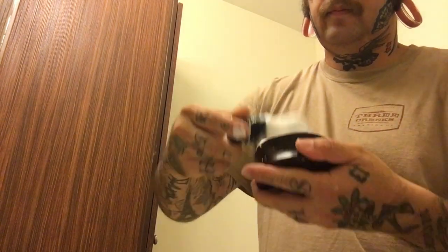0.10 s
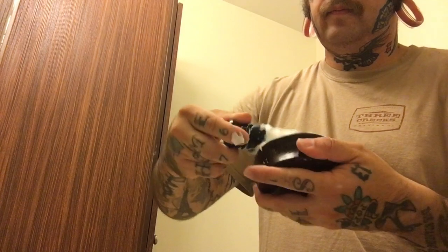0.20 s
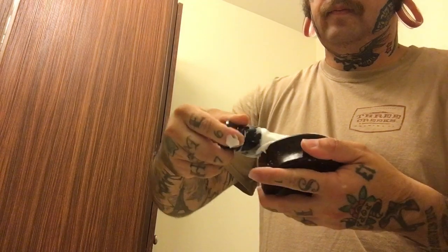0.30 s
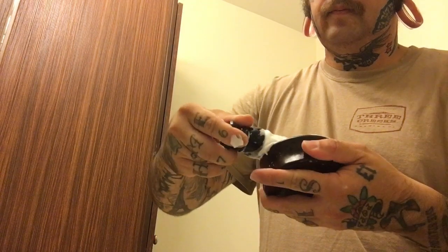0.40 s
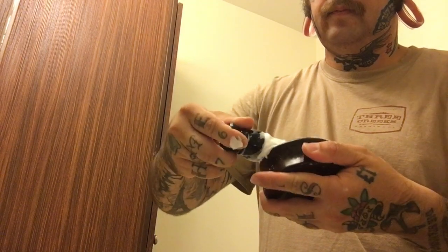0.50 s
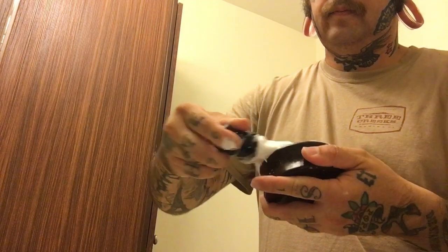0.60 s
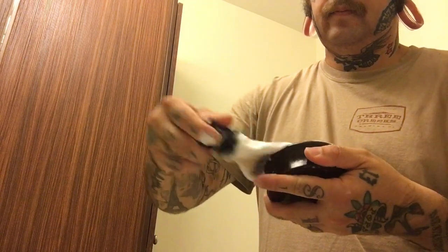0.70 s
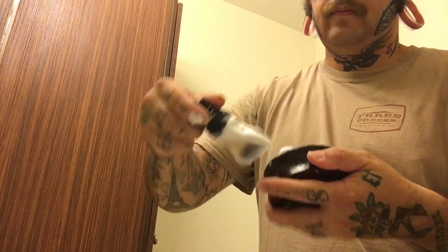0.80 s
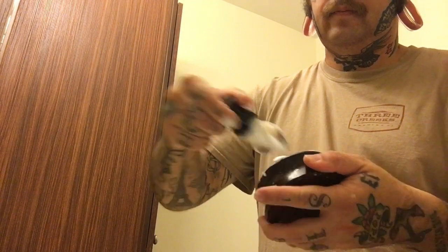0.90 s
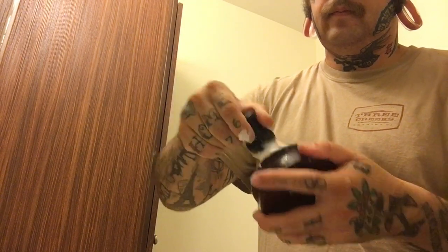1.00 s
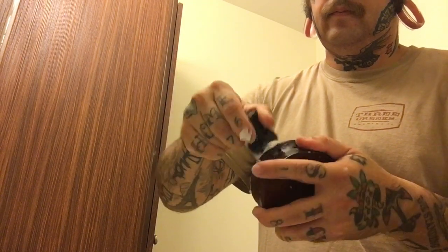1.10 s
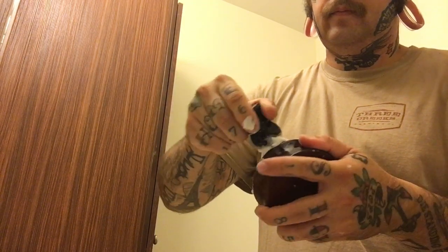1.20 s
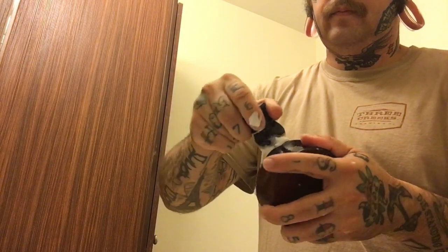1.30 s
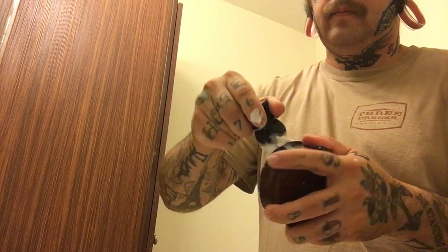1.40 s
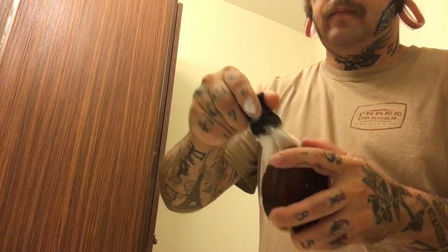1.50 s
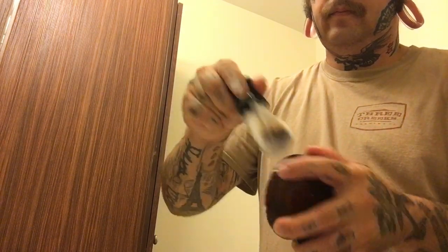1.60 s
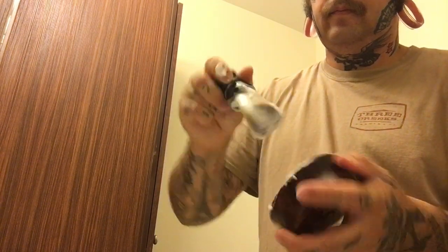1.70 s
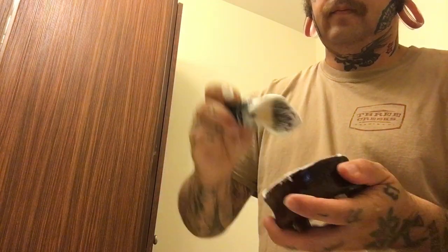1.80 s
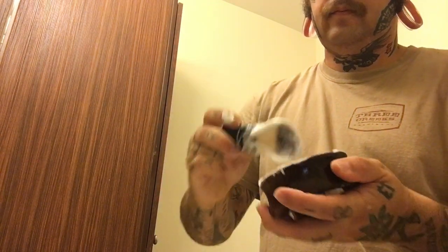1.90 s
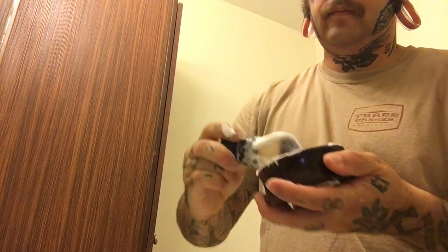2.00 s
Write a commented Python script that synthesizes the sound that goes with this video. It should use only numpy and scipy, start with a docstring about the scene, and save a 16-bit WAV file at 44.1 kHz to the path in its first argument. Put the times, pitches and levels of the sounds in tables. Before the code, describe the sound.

Two hard wooden knocks ring briefly in a small bathroom as a shaving brush hits the rim of a bowl. A quiet, foamy swish of bristles follows each one, heard from nearby over faint electrical hum.

```python
"""Shaving brush in a wooden bowl

A shaving brush works lather in a hand-held wooden bowl, in a small, live bathroom.
Twice its handle ticks and then knocks hard on the rim; after each knock the wet bristles
are drawn out over the edge with a soft, fizzing swish. Mains hum and faint room noise lie underneath."""
import sys
import numpy as np
from scipy import signal
from scipy.fft import rfft, irfft, next_fast_len
from scipy.io import wavfile

SR = 44100
rng = np.random.default_rng(int(sys.argv[2]) if len(sys.argv) > 2 else 0)


def unload_audio(sound):
    """Save the sound as a 16-bit wav file, at the path given as the first command line argument."""
    columns = np.transpose(np.atleast_2d(sound))
    # keep every value between -1 and 1, then stretch to whole-number steps
    steps = np.round(np.clip(columns, -1, 1) * 32767)
    wavfile.write(sys.argv[1], SR, steps.astype(np.int16))


N = 88200
TIME = np.arange(N) / SR


def amp(db):
    """Decibels to gain."""
    return 10 ** (np.asarray(db) / 20)


def unit(x):
    """Scale to rms 1."""
    return x / np.sqrt(np.mean(x ** 2) + 1e-20)


def along(points, hz):
    """Read a curve of (Hz, value) points on a log frequency axis."""
    point_hz, values = np.transpose(points)
    return np.interp(np.log(hz + 1), np.log(point_hz + 1), values)


def filtered(x, response):
    """Shape x with a frequency response."""
    size = next_fast_len(N + SR // 2)
    return irfft(rfft(x, size) * response(np.fft.rfftfreq(size, 1 / SR)), size)[:N]


def causal(x, gain):
    """Colour x at minimum phase, so nothing smears ahead of its attack."""
    def response(hz):
        cepstrum = irfft(np.log(np.maximum(gain(hz), 1e-6)))
        half = len(cepstrum) // 2
        return np.exp(rfft(cepstrum * np.r_[1, np.full(half - 1, 2), 1, np.zeros(half - 1)]))
    return filtered(x, response)


def noise(response):
    """Coloured noise of rms 1."""
    return unit(filtered(rng.standard_normal(N), response))


def cut(x, hz, kind, order):
    """Butterworth low-pass or high-pass."""
    return signal.sosfilt(signal.butter(order, hz, kind, fs=SR, output="sos"), x)


def since(start):
    """Seconds since start, zero before it."""
    return np.maximum(TIME - start, 0)


def gate(start, end, edge_s=0.0049):
    """Open at start and close at end, with soft edges."""
    return (1 - np.exp(-since(start) / edge_s)) * np.exp(-since(end) / edge_s)


# Room tone EQ. Each row: frequency in Hz, level in dB.
AIR_EQ = [(20, -27.5), (42, 0), (62, -2.5), (85, -9.5), (130, -5.5), (200, -7.5), (260, -14), (330, -7.5),
          (450, -16), (700, -18), (1290, -26), (2000, -28), (3200, -32), (5280, -31.5), (8000, -41),
          (11000, -41.5), (16000, -46.5)]
# Steady low tones: mains hum at 59, 118.5 and 175 Hz, and a faint room resonance at 437 Hz.
# Each row: frequency in Hz, level in dB.
STEADY_TONES = [(59, -64.5), (118.5, -74), (175, -77.5), (437, -75.5)]


def room_tone():
    """A bed of still air, mains hum and a room resonance, each tone wavering in level on its own."""
    out = amp(-64.5) * noise(lambda hz: amp(along(AIR_EQ, hz)))
    for hz, db in STEADY_TONES:
        waver_db = 6 * noise(lambda f: np.exp(-(f / 6) ** 2))
        out += np.sqrt(2) * amp(db + waver_db) * np.sin(2 * np.pi * (hz * TIME + rng.random()))
    return out


# Lather EQ. Each row: frequency in Hz, level in dB.
LATHER_EQ = [(200, -11.5), (700, -5.5), (1500, 7), (2500, 3), (4200, 1), (5000, -5.5), (6000, 0.5),
             (7500, -4.5), (9000, -7.5), (10300, -14.5), (12000, -11), (15000, -13.5)]


def foam(bubbles_per_s=900, spread_db=5):
    """Bristle hiss with tiny bursting bubbles."""
    pops = (rng.random(N) < bubbles_per_s / SR) * rng.standard_normal(N)
    pops *= amp(spread_db * rng.standard_normal(N))
    fizz = rng.standard_normal(N) + 0.6 * unit(pops)
    return unit(filtered(fizz, lambda hz: amp(along(LATHER_EQ, hz))))


# Brush moves in the lather. Each row: start in seconds, end in seconds, level in dB.
BRUSH_SQUEEZES = [(0, .19, -75.5), (0.314, 0.645, -68), (1.181, 1.494, -68), (1.725, 1.992, -79.5)]


def squeezes():
    """A quiet fizz as the brush is pressed or turned in the foam."""
    return sum(amp(db) * gate(start, end) * foam() for start, end, db in BRUSH_SQUEEZES)


# Reverb decay. Each row: frequency in Hz, time to fall 60 dB in seconds.
REVERB_T60 = [(150, .6), (350, 1), (700, 1), (1100, 0.65), (2200, 0.64), (4000, 0.56), (8000, 0.45),
              (14000, 0.37)]
# Reverb EQ. Each row: frequency in Hz, level in dB.
REVERB_EQ = [(150, -18), (250, -1), (330, 6.5), (450, 1), (560, -5), (700, 5.5), (830, 3), (950, -2.5),
             (1050, 5), (1300, -10), (1450, 0), (1750, -8), (2300, 6.5), (2750, -6), (3200, 3), (4100, 0),
             (8500, 1.5), (14000, -4.5)]


def bathroom(x, onset_s=0.0077, early_db=1, early_t60_s=0.26):
    """The room's reverb: a quick first decay and a longer tail that dies sooner in the treble."""
    hz, t, spectrum = signal.stft(rng.standard_normal(SR), SR, nperseg=256)
    decay = amp(-60 * t / along(REVERB_T60, hz)[:, None]) + amp(early_db - 60 * t / early_t60_s)
    colour = amp(along(REVERB_EQ, hz))[:, None]
    tail = signal.istft(spectrum * decay * colour, SR, nperseg=256)[1][:SR]
    tail *= 1 - np.exp(-(TIME[:SR] / onset_s) ** 2)
    return signal.fftconvolve(x, tail / np.linalg.norm(tail))[:N]


# The bowl's modes. Each row: frequency in Hz, time to fall 60 dB in seconds,
# level in dB when struck at the first spot on the rim, level in dB at the second.
BOWL_MODES = [(370, 0.0085, -31, -26), (708.7, 0.0466, -26.5, -33.5), (1131.6, 0.026, -0.5, 0),
              (1378, .02, -0.5, 0), (1843, 0.014, -1, 0.5), (2148, 0.023, -5.5, -6.5),
              (2510, .014, -14.5, -11), (2948, .014, -14.5, -11.5), (4224, 0.0065, -20, -9.5),
              (4560, .014, -22, -34), (5213, 0.012, -18, -38.5), (6020, 0.012, -27, -16.5),
              (8450, 0.002, -32.5, -24)]


def bowl(start, spot, pitch, ring, contact_hz):
    """The hand-damped bowl rings, neighbouring modes in opposite polarity; a softer contact dulls it."""
    t = since(start)
    modes = np.zeros(N)
    for k, (hz, t60, *spot_db) in enumerate(BOWL_MODES):
        envelope = amp(spot_db[spot] - 60 * t / (t60 * ring))
        modes += (-1) ** k * envelope * np.sin(2 * np.pi * hz * pitch * t)
    return cut(modes, contact_hz, "low", order=3)


# A light touch ahead of each knock. Each row: start in seconds, level in dB.
RIM_TOUCHES = [(0.2105, -40.5), (1.155, -46)]


def ticks():
    """The handle grazes the rim: a thin, short tick with plenty of room on it."""
    out = np.zeros(N)
    for spot, (start, db) in enumerate(RIM_TOUCHES):
        wood = bowl(start, spot, pitch=0.99, ring=0.4, contact_hz=3500)
        tick = cut(wood, 1500, "high", order=2)
        out += amp(db) * (tick + amp(6.5) * bathroom(tick))
    return out


# Crack EQ. Each row: frequency in Hz, level in dB.
CRACK_EQ = [(150, -21.5), (420, -9.5), (620, -20), (1000, -9.5), (1700, 6.5), (2700, -1), (3500, -17.5),
            (5000, -19.5), (7200, -25.5), (9300, -29), (10500, -38), (15000, -30.5)]


def crack(start, db, cutoff_hz, grit_db=-16, t60_s=0.024):
    """The attack of handle on wood: a click with a short, gritty tail."""
    t = since(start)
    blow = rng.standard_normal(N) * (t > 0) * amp(grit_db - 60 * t / t60_s)
    blow[round(start * SR)] += 1
    coloured = causal(blow, lambda hz: 10 * amp(db + along(CRACK_EQ, hz)))
    return cut(coloured, cutoff_hz, "low", order=4)


# Hard hits. Each row: start in seconds, level in dB, pitch factor, ring length factor,
# ring low-pass in Hz, crack trim in dB, crack low-pass in Hz, reverb send in dB.
RIM_KNOCKS = [(0.2342, -8.5, 1.0284, 0.91, 4600, -7.5, 15730, 0),
              (1.1757, -9.5, 0.973, 0.8, 3820, -12, 8400, -5.5)]


def knocks(door_delay_s=0.0027, door_db=-8.5):
    """The handle hits the rim: a crack, a short wooden ring, a slap off the near door, then the room."""
    out = np.zeros(N)
    for spot, (start, db, pitch, ring, contact_hz, crack_db, crack_hz, send_db) in enumerate(RIM_KNOCKS):
        hit = bowl(start, spot, pitch, ring, contact_hz) + crack(start, crack_db, crack_hz)
        hit = cut(hit, 238, "high", order=4)
        door = filtered(hit, lambda hz: amp(door_db) * np.exp(-2j * np.pi * hz * door_delay_s))
        out += amp(db) * (hit + door + amp(send_db) * bathroom(hit))
    return out


# Brush strokes. Each row: start, peak and end in seconds, rise and fall in dB,
# hiss level and hollow level in dB, the hollow's first and last pitch in Hz.
RIM_STROKES = [(0.659, 0.755, 0.9, 11.5, 21.5, -57, -55.5, 1126, 1479),
               (1.477, 1.597, 1.705, 8.5, 14, -59.5, -61, 1051, 1280)]


def swishes(half_hold_s=0.01, hollow_width_hz=700, hollow_lead_s=0.022):
    """Bristles drag over the rim, swelling and fading; the bowl's hollow rises as the brush leaves."""
    out = np.zeros(N)
    for start, peak, end, rise_db, fall_db, hiss_db, hollow_db, start_hz, end_hz in RIM_STROKES:
        corners_s = [start, peak - half_hold_s, peak + half_hold_s, end]
        swell_db = np.interp(TIME, corners_s, [-rise_db, 0, 0, -fall_db])
        early_swell_db = np.interp(TIME + hollow_lead_s, TIME, swell_db)
        glide_hz = np.interp(TIME, [start, end], [start_hz, end_hz])
        band = noise(lambda hz: 1 / (1 + (2 * hz / hollow_width_hz) ** 2) ** 2)
        hollow = unit(band * np.sin(2 * np.pi * np.cumsum(glide_hz) / SR))
        hiss = amp(hiss_db + swell_db) * foam()
        out += gate(start, end) * (hiss + amp(hollow_db + early_swell_db) * hollow)
    return out


# Spray EQ. Each row: frequency in Hz, level in dB.
SPRAY_EQ = [(1000, -31.5), (4000, -1.5), (7000, 3), (10300, -8), (13000, -2), (15500, -4)]
# A flick late in each stroke. Each row: peak in seconds, half length in seconds, level in dB.
TIP_FLICKS = [(.795, .05, -65), (1.667, 0.038, -69.5)]


def flicks():
    """An airy spray as the wet bristle tips spring free of the rim."""
    out = np.zeros(N)
    for peak, half_s, db in TIP_FLICKS:
        envelope = amp(db) * np.exp(-((TIME - peak) / half_s) ** 2)
        out += envelope * noise(lambda hz: amp(along(SPRAY_EQ, hz)))
    return out


def scene():
    """Brush, bowl and room tone in mono, with a light reverb on the lather."""
    handle = knocks() + ticks()
    lather = swishes() + squeezes()
    return (handle + lather + amp(-12) * bathroom(lather) + flicks() + room_tone())[None]


def record(dry):
    """A brick-wall low-pass takes off the very top."""
    return filtered(dry[0], lambda hz: hz < 15850)[None]


dry = scene()
out = record(dry)
unload_audio(out)
```